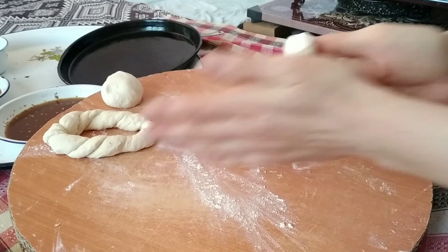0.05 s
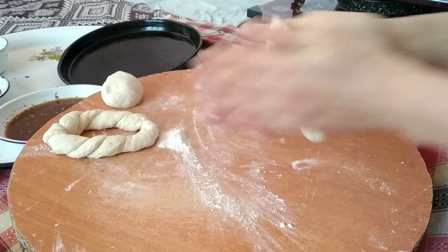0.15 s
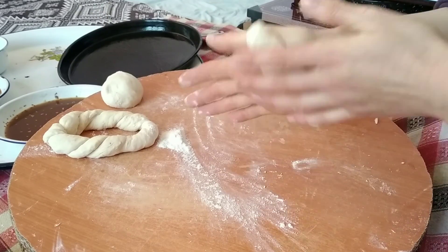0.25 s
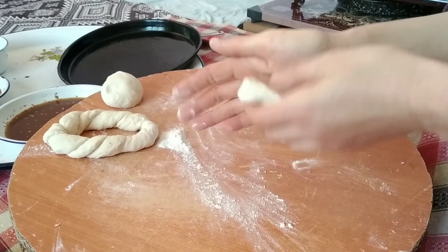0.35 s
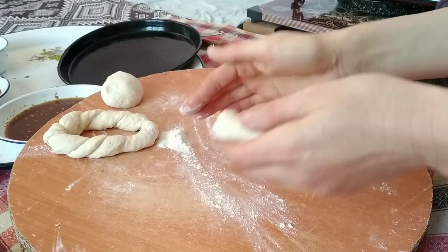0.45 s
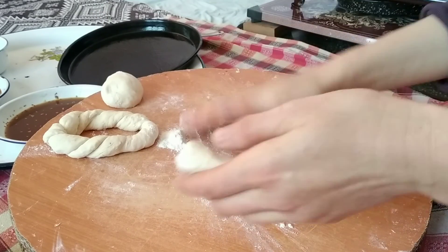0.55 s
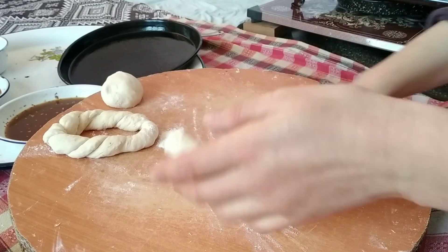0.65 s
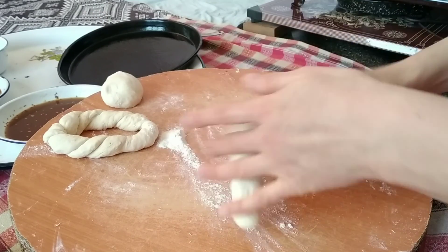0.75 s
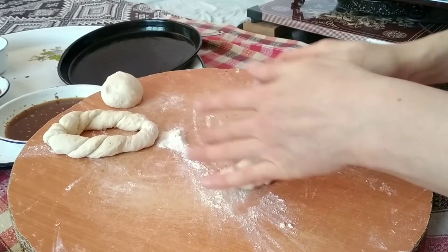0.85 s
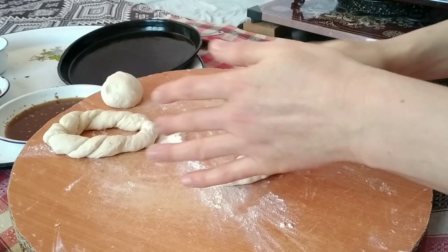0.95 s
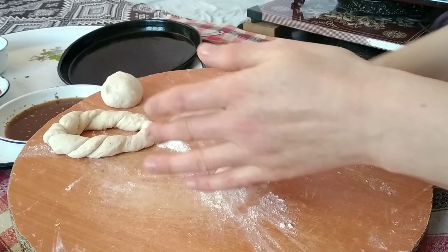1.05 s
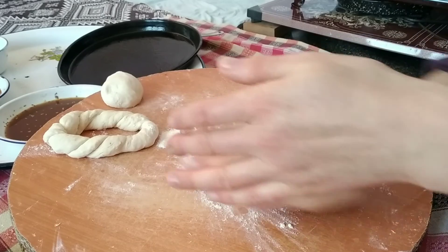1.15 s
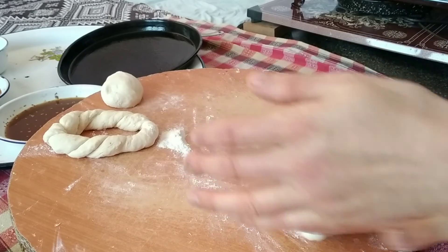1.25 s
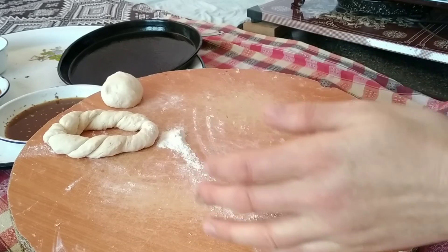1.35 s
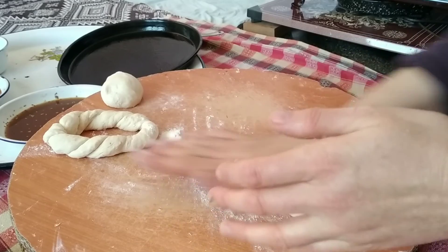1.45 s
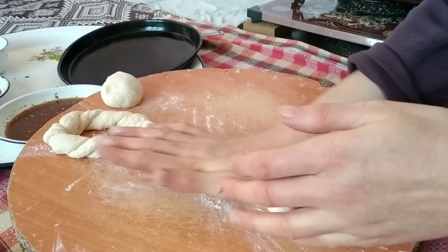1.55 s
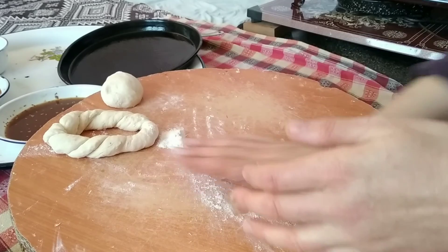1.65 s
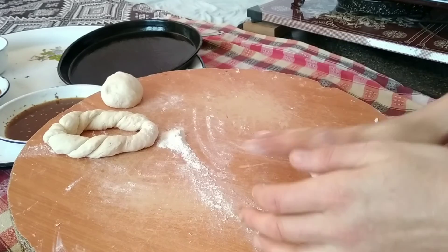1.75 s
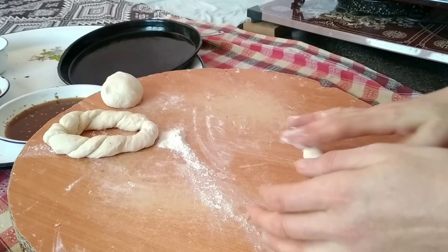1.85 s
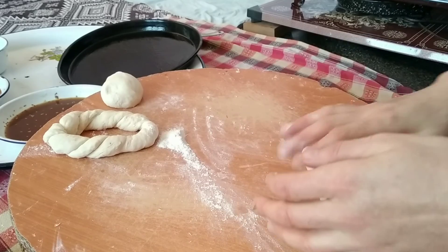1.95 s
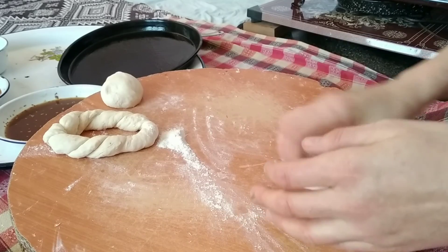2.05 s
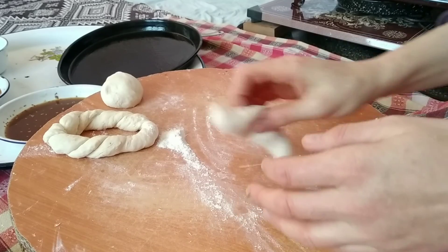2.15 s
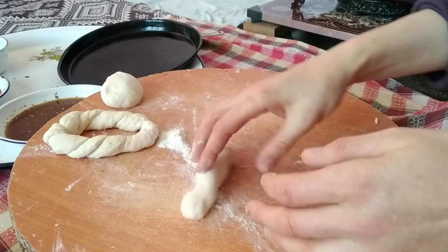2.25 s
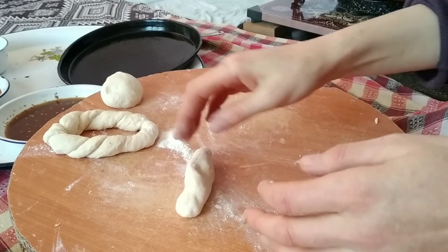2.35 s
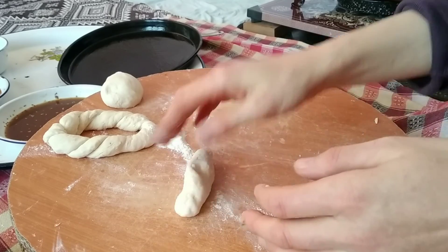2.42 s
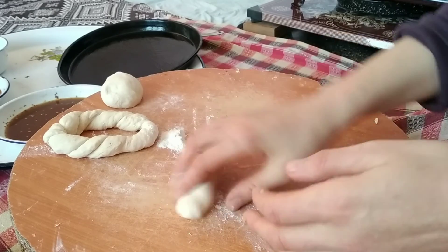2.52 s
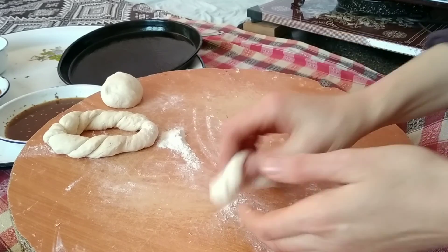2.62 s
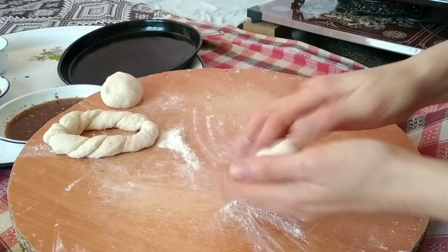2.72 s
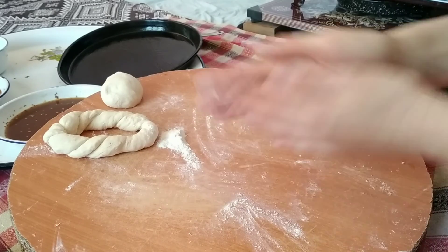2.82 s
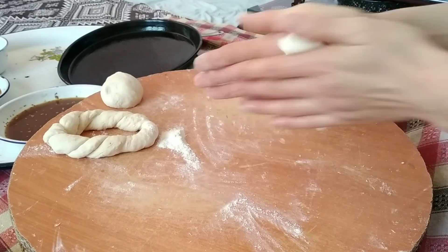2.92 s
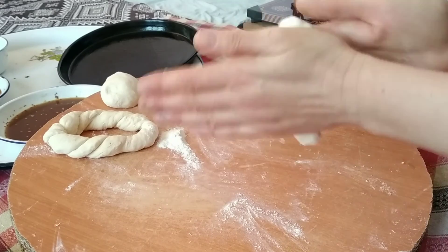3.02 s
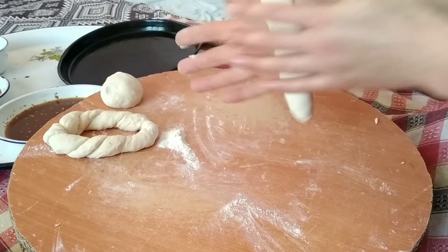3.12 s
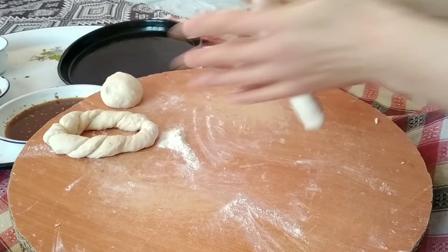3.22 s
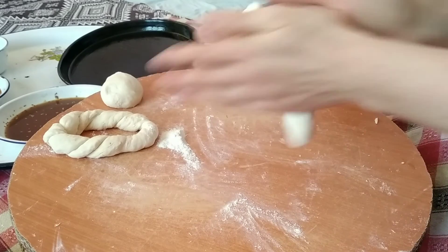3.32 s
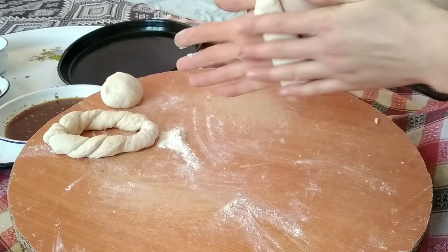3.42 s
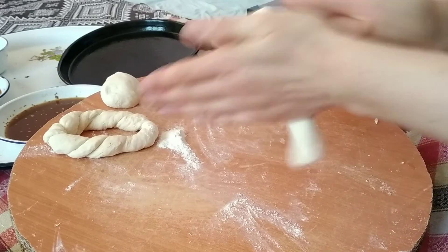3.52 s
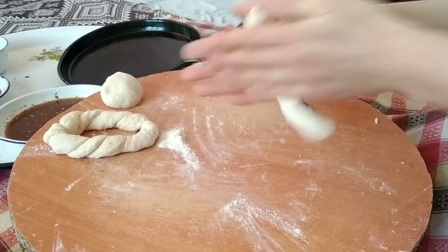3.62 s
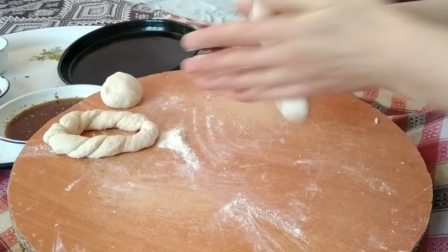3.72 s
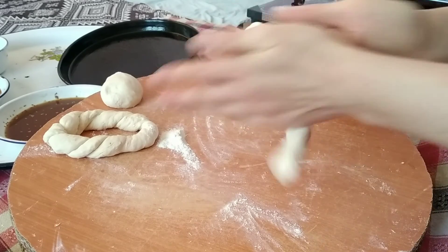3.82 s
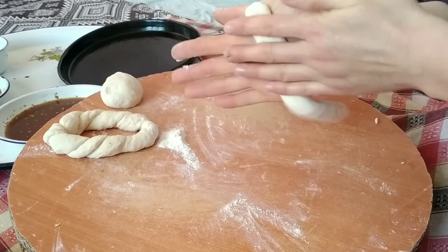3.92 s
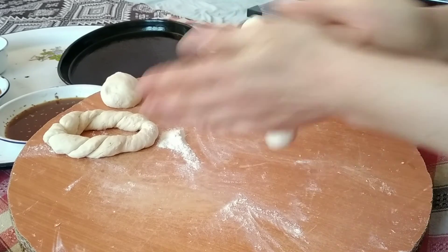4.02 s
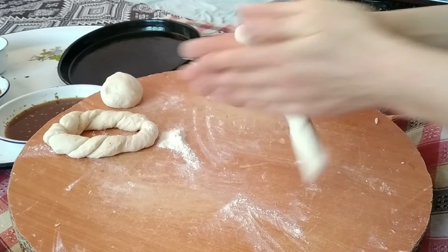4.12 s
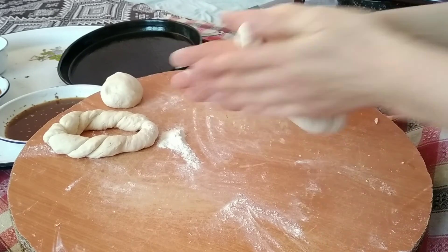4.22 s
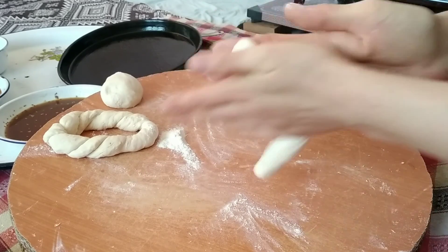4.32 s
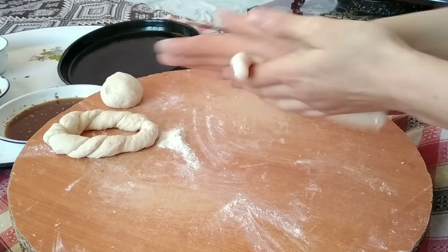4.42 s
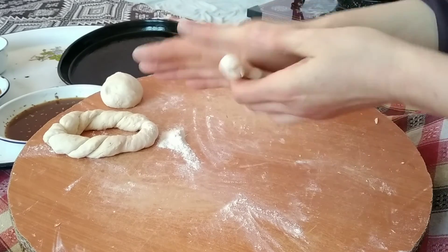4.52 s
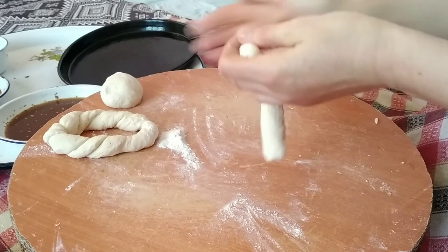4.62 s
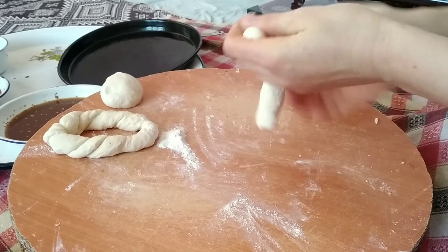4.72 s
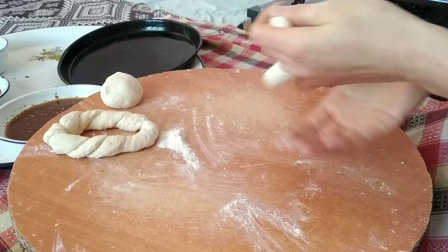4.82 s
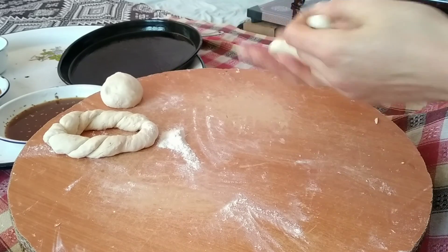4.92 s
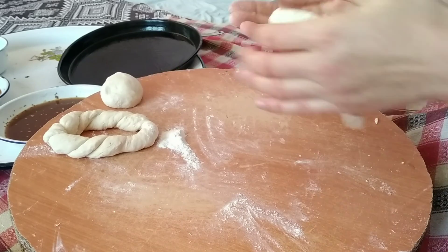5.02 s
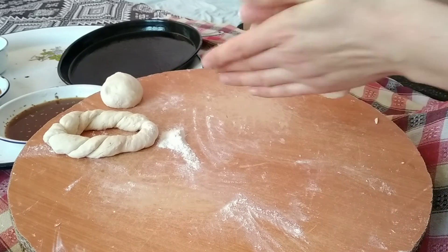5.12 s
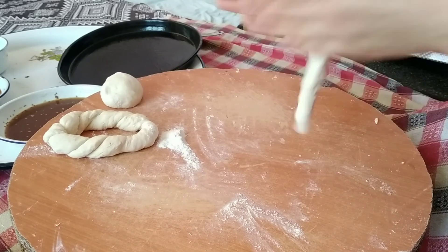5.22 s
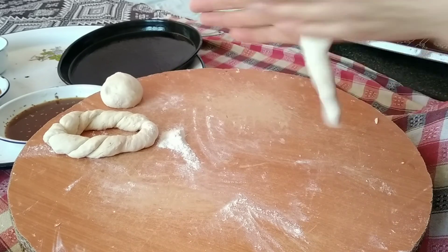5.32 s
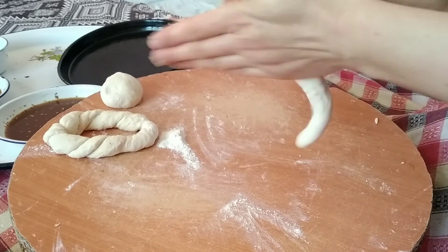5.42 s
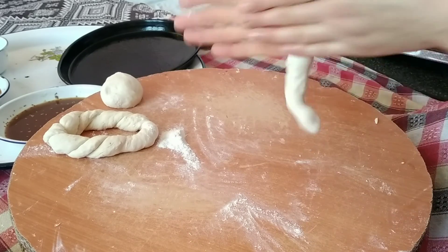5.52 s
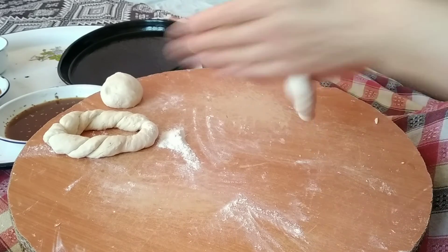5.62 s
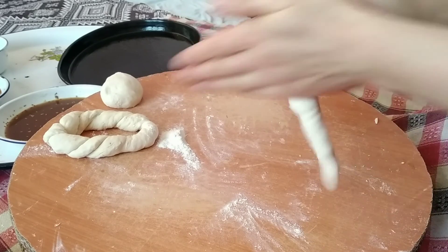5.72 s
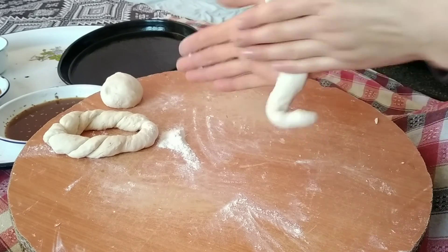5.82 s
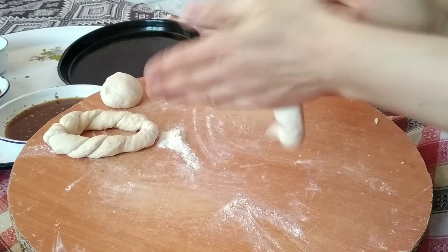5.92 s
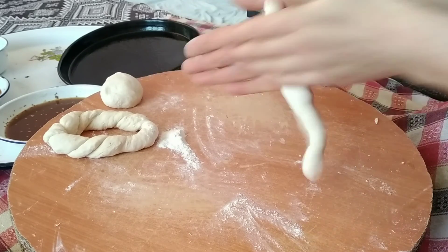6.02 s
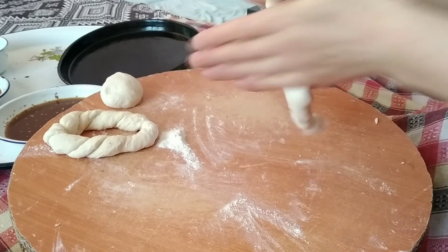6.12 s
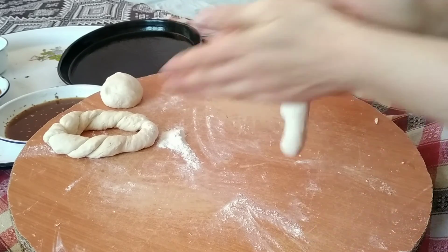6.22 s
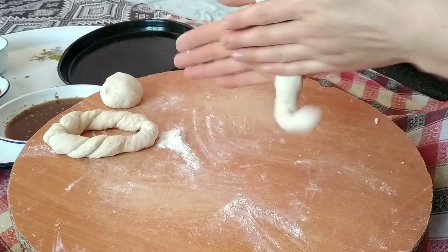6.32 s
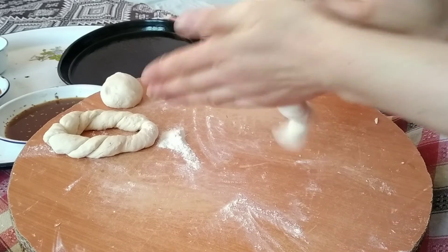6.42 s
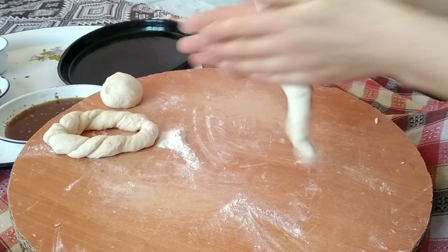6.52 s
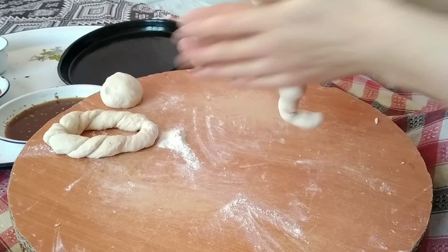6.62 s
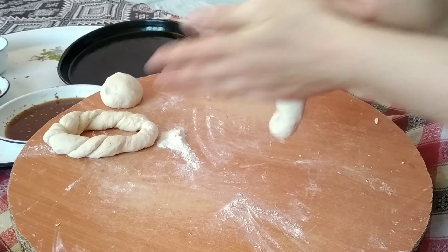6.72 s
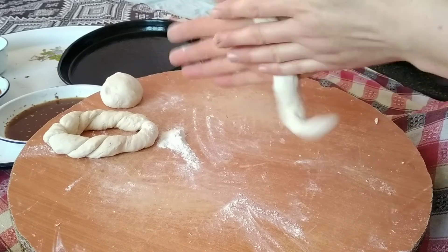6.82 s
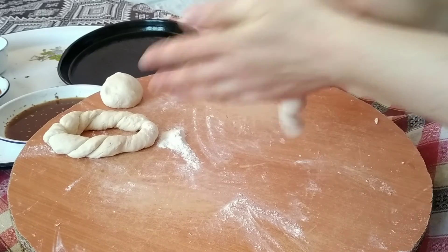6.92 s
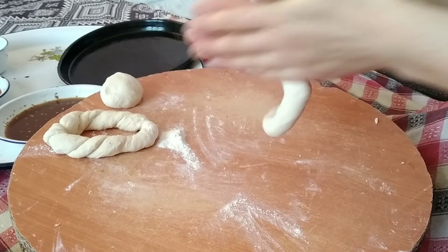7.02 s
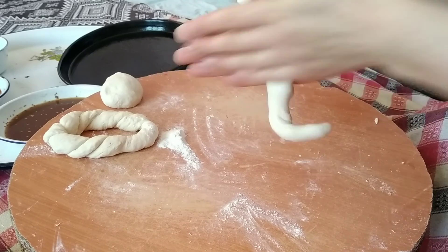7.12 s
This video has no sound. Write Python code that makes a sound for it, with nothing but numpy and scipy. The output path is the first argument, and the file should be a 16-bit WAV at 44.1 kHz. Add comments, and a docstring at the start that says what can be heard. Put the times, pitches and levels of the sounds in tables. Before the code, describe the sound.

A quiet kitchen heard close up, with steady faint airy hiss and low rumble throughout. From 0 to 0.7 s floury hands make brief soft scuffs. A hollow low knock on the wooden board with a woody click lands at 0.8 s, followed by small dull pats around 1.1-1.3 s and longer dry rubs at 1.4 and 1.6 s. A deep soft thump comes at 2.0 s, a lighter one at 2.25 s and another firm one at 2.5 s, among short slides. From 2.8 to 4.4 s palms rub quickly to and fro, about eight dry swishes a second, each with a hollow airy pitch that dips and rises; a faint low bump sits near 4.0 s. Between 4.5 and 5.1 s there are only sparse scuffs and tiny pats. From 5.15 s the rapid, gritty rubbing resumes, slightly thinner and uneven in strength, continuing to the end just after 7 s.

```python
"""Two floury palms roll a piece of dough to and fro above a round wooden board in a quiet kitchen.
Each stroke is a short dry hiss of shaped noise, with a hollow pocket tone whose pitch dips and rises again.
Dough and knuckles knock on the board: ringing modes give a low boom and woody clicks, noise gives the slap.
A short noise reverb is the room; steady airy hiss, faint low rumble and one soft bump are the house."""
import sys
import numpy as np
from scipy import signal
from scipy.fft import rfft, irfft, next_fast_len
from scipy.io import wavfile

SR = 44100
rng = np.random.default_rng(int(sys.argv[2]) if len(sys.argv) > 2 else 0)


def wrap_up_sound(samples):
    """Save the sound to the file named by the first command line argument, as 16-bit audio."""
    columns = np.atleast_2d(samples).T
    # keep every value between -1 and 1, then stretch to whole-number steps
    tamed = np.clip(columns, -1, 1)
    steps = np.round(tamed * 32767).astype(np.int16)
    wavfile.write(sys.argv[1], SR, steps)


N = 315756   # length in samples
STEP = 64   # samples between control points
RUN_IN = 2000   # control points dropped while a slow filter settles

# Palm strokes, to and fro:
# (start [s], hold [s], flour hiss before colouring [dB], lowest pitch of the air pocket [Hz])
PALM_STROKES = [(0.121, .073, -48.4, 1700), (1.378, .109, -49.9, 1150), (1.588, .085, -50.6, 1600),
                (2.79, .055, -43.8, 750), (2.918, .06, -49.8, 2000), (3.043, .048, -44.4, 1650),
                (3.175, .057, -46.4, 1900), (3.298, .057, -43, 1900), (3.433, .06, -46.5, 2100),
                (3.553, .048, -41.0, 1650), (3.694, .046, -44.1, 1900), (3.806, .054, -41.8, 1650),
                (3.941, .064, -45.6, 1600), (4.061, .047, -42.6, 2200), (4.199, .064, -47.8, 2000),
                (4.321, .12, -43.5, 2600), (5.154, .06, -45.8, 2100), (5.285, .085, -47, 2300),
                (5.413, .065, -43, 1900), (5.568, .06, -45.6, 2300), (5.681, .072, -45.4, 2300),
                (5.821, .08, -46.4, 2100), (5.93, .073, -45.5, 2300), (6.075, .056, -44.8, 2100),
                (6.2, .05, -44.3, 1800), (6.316, .075, -47.2, 1800), (6.45, .047, -41.3, 1600),
                (6.566, .085, -50.8, 1550), (6.704, .048, -44.6, 1700), (6.84, .045, -48.5, 1750),
                (6.959, .05, -46.6, 1750), (7.089, .058, -51.3, 1900)]
ROLL_RISE_S, ROLL_FALL_S = .016, .025   # the hiss edges gain or lose 8 dB in this time
USUAL_HISS_DB, DRAG_DB = -45, -57   # reference stroke hiss, and the skin drag that goes with it
# Share of a stroke's extra hiss that each layer takes on: (dough [dB/dB], hollow [dB/dB], drag [dB/dB])
FOLLOW_SHARES = (.2, .4, .45)
# The lump thins to a rope and the palms cup closer; levels at the usual hiss:
# (time [s], dough [dB], palm hollow [dB])
GRIP = [(0, -64, -64), (2.8, -65, -66), (3.3, -68, -63), (4.3, -70, -66), (5.4, -73, -67), (6.1, -71, -64),
        (7.1, -73, -63)]
# Other short slides, scuffs and pats of hands and dough, some leading into or between palm strokes:
# (start [s], hold [s], rise [s per 8 dB], fall [s per 8 dB], flour hiss before colouring [dB],
#  skin drag re hiss [dB], dough re hiss [dB]); the rise and fall are those of the hiss
SHORT_SLIDES = [(0.0, .031, .012, .03, -49.2, -10.6, -17.5), (0.298, .025, .017, .017, -49, -16, -23.3),
                (0.415, .02, .02, .06, -64.5, -6, -13.5), (0.574, .089, .005, .032, -48.4, -11.3, -30),
                (0.792, .018, .002, .045, -49.5, -9, -20), (1.096, .012, .005, .017, -60.8, -5.3, -17.1),
                (1.153, .061, .03, .045, -51.5, -7, -12), (1.338, .026, .012, .03, -49.5, -2.5, -17.5),
                (1.981, .03, .007, .05, -54.5, -13.2, -17.9), (2.045, .025, .015, .04, -60, -6, -12),
                (2.157, .034, .021, .035, -64.5, -11.7, -14.8), (2.23, .024, .012, .032, -57.4, -3, -11),
                (2.516, .062, .011, .046, -51.3, -7.5, -18.5), (2.651, .016, .006, .024, -47.4, -13.2, -15),
                (2.755, .03, .02, .02, -56, -16, -20), (4.472, .041, .027, .011, -48.9, -17.6, -24.1),
                (4.895, .03, .004, .022, -52.9, -12.2, -21.9), (5.07, .022, .018, .04, -52.7, -8.5, -17),
                (5.779, .008, .004, .012, -48, -16, -30)]
SLIDE_HOLLOW_DB = -7.5   # palm hollow re skin drag in the short slides
# How steeply each layer fades: (dough [ratio], hollow [ratio], drag [ratio], hiss [ratio])
EDGE_STEEPNESS = (.9, .8, .85, 1)
# How much each layer swells towards mid-stroke: (dough [ratio], hollow [ratio], drag [ratio], hiss [ratio])
ARCH_AMOUNT = (.5, .5, .5, 1)
# Friction colour, before the layer levels: (frequency [Hz], relative level [dB])
FRICTION_COLOUR = [(450, -8), (750, 0), (1100, -3), (1400, -4), (1800, -1), (2400, -1.5), (3000, -1),
                   (4000, 1), (6000, 2), (6500, -10), (7500, -4), (8900, 1), (11500, -4), (15500, -6)]
# Crossovers between the layers: (dough to hollow [Hz], hollow to drag [Hz], drag to hiss [Hz])
LAYER_SPLITS = (1300, 2500, 6300)
LOWEST_RUB_HZ = 400
CUP_CLOSED_AT, CUP_DB = .62, 2.1   # share of the hold where the pocket is lowest; level re palm hollow
CUP_WIDTH_HZ, CUP_OCTAVE_S = 130, .09   # resonance width; time to rise an octave
CUP_LIFE_S = .045   # this far from its lowest pitch the pocket tone is 6 dB down

# Knocks and pats, each layer with its own make-up gain in board():
# (time [s], boom [relative dB], low wood [relative dB], high wood [relative dB], slap [relative dB])
KNOCKS = [(0.789, -23, -49, -36, -42), (1.1, -44, -71, -55, -59), (1.13, -41, -53, -63, -63),
          (1.161, -38, -48, -57, -55), (1.297, -49, -56, -63, -66), (1.675, -45, -54, -62, -61),
          (1.988, -19, -46, -47, -67), (2.239, -36, -57, -51, -56), (2.5, -21, -46, -55, -56),
          (2.656, -45, -61, -58, -58), (2.702, -51, -66, -61, -65), (2.81, -52, -70, -55, -58),
          (4.495, -49, -75, -63, -63), (4.898, -53, -72, -65, -62), (5.074, -51, -69, -57, -55.5)]
# Low modes of the board on its cloth: (frequency [Hz], relative level [dB], t60 [s])
BOOM_MODES = [(142, -17, .5), (155.5, 0, .25), (187, -12, .17), (207, -5, .07), (260, -15, .2)]
# Which way each boom mode starts, in order: (polarity [+1 or -1] per mode)
BOOM_POLARITY = (1, 1, 1, -1, 1)
# Higher wood modes of the board: (frequency [Hz], relative level [dB], t60 [s])
WOOD_MODES = [(330, -4, .09), (372, 0, .1), (430, -5, .08), (490, -2, .1), (545, -3, .09), (600, -4, .09),
              (655, -3, .09), (700, -3, .08), (740, -2, .09), (815, -3, .08), (870, -1, .1), (930, -4, .07),
              (1030, -6, .05), (1150, -7, .05), (1280, -7, .05), (1450, -9, .04)]

KITCHEN_T60_S, WALL_CUT_HZ, WET_DB = .65, 13000, -16
# A soft bump in the house: (time [s], frequency [Hz], level before its swell [dB], t60 [s])
HOUSE_BUMP = (3.975, 74, -32, .3)
# Broad bass resonances of the room: (frequency [Hz], width [Hz], level per Hz at the peak [dB])
ROOM_RUMBLE = [(26, 7, -77), (62, 15, -65), (52, 4, -68), (84, 18, -66), (115, 14, -65), (140, 18, -74),
               (170, 22, -80), (220, 60, -80.5)]
# Steady background noise: (frequency [Hz], level per Hz [dB])
AIR_NOISE = [(20, -94), (42, -112), (200, -95), (300, -95.5), (450, -103), (1000, -109), (1600, -109),
             (2500, -113), (5700, -113.5), (8800, -107), (12000, -113), (15500, -108)]
# Stereo image, 1 is mono: (frequency [Hz], left-right likeness [0 to 1])
STEREO_LIKENESS = [(30, .97), (130, .98), (250, .55), (600, .55), (1400, .4), (3100, .35), (6100, .15),
                   (7000, .95), (10000, .96), (15000, .7)]
BASS_LEAN_DB = -1.0   # left minus right, for board, house and bump
CUTOFF_HZ = 16100


def palms(grit_db, patchy_db):
    """Flour under sliding skin: fine noise that catches and slips many times a second."""
    grit = .55 * drift(45) + .8 * drift(200)
    levels_db = stroke_levels() + grit_db * grit
    per_hz_db = (-27.5, -30, -35.5, -37.5)   # spreads each layer's level over its width
    shared, apart = np.zeros((2, N))
    for hz, mid, side in bands(LOWEST_RUB_HZ):
        layer = np.searchsorted(LAYER_SPLITS, hz)
        colour_db = at_hz(FRICTION_COLOUR, hz) + per_hz_db[layer]
        gain = every_sample(from_db(colour_db + levels_db[layer] + patchy_db * drift(14)))
        shared += gain * mid
        apart += gain * side
    return cupped_air(levels_db[1]) + np.array([shared + apart, shared - apart])


def stroke_levels():
    """Level in dB of dough, hollow, drag and hiss: the powers of palm strokes and short slides add up."""
    power = 1e-14   # floor that keeps the logarithm finite
    grip_s, dough_db, hollow_db = np.transpose(GRIP)
    for start, hold, hiss_db, _ in PALM_STROKES:
        usual = np.array([np.interp(start, grip_s, dough_db), np.interp(start, grip_s, hollow_db), DRAG_DB])
        body_db = usual + np.array(FOLLOW_SHARES) * (hiss_db - USUAL_HISS_DB)
        power = power + swell(start, hold, ROLL_RISE_S, ROLL_FALL_S, [*body_db, hiss_db])
    for start, hold, rise, fall, hiss_db, drag, dough in SHORT_SLIDES:
        layers_db = hiss_db + np.array([dough, drag + SLIDE_HOLLOW_DB, drag, 0])
        power = power + swell(start, hold, rise, fall, layers_db)
    return 10 * np.log10(power)


def swell(start, hold, rise, fall, layers_db):
    """Power of dough, hollow, drag and hiss for one movement: it swells, holds and fades."""
    s = control_time() - start
    arch = 1.5 - 5.5 * np.clip(2 * s / hold - 1, -1, 1) ** 2   # speed peaks mid-stroke
    edge = -8 * np.maximum(-s, 0) / rise - 8 * np.maximum(s - hold, 0) / fall
    shape_db = np.outer(ARCH_AMOUNT, arch) + np.outer(EDGE_STEEPNESS, edge)
    return from_db(2 * (shape_db + np.array(layers_db)[:, None]))


def cupped_air(hollow_db):
    """Friction noise rings in the pocket between closing and opening palms: pitch dips each stroke."""
    start, hold, _, lowest_hz = np.transpose(PALM_STROKES)
    gap = control_time()[:, None] - (start + CUP_CLOSED_AT * hold)
    nearest = np.argmin(np.abs(gap), axis=1)
    away = gap[np.arange(len(gap)), nearest]
    centre = lowest_hz[nearest] * 2 ** np.minimum(np.abs(away) / CUP_OCTAVE_S, 1)   # at most an octave up
    friction = rng.standard_normal((2, N))
    mid, side = rms_one(gliding_resonance(friction, centre, CUP_WIDTH_HZ))
    gain = every_sample(from_db(hollow_db + CUP_DB - 6 * (away / CUP_LIFE_S) ** 2))
    return gain * (.85 * mid + .45 * side * [[1], [-1]])


def gliding_resonance(x, hz, width_hz):
    """Two-pole resonance whose centre moves block by block."""
    r = np.exp(-np.pi * width_hz / SR)
    state, out = np.zeros((2, 2)), np.zeros_like(x)
    for k in range(0, N // STEP + 1, 2):
        block = slice(k * STEP, (k + 2) * STEP)
        poles = [1, -2 * r * np.cos(2 * np.pi * hz[k] / SR), r * r]
        out[:, block], state = signal.lfilter([1, 0, -1], poles, x[:, block], zi=state)
    return out


def bands(low_hz):
    """Third-octave noise, unit level per Hz: yields centre, shared part and part that differs by ear."""
    edges = low_hz * 2 ** np.arange(0, np.log2(19000 / low_hz), 1 / 3)
    white = rng.standard_normal((2, 2, N)) * np.sqrt(SR) / 2
    for k, (low, high) in enumerate(zip(edges, edges[1:])):
        hz = np.sqrt(low * high)
        alike = np.clip(at_hz(STEREO_LIKENESS, hz), 0, 1)
        sos = signal.butter(2, [low, high], "band", fs=SR, output="sos")
        sos[0, :3] *= np.sqrt(1 + alike)
        mid, side = signal.sosfilt(sos, white[k % 2])   # neighbouring bands use different noise
        yield hz, mid, side * np.sqrt((1 - alike) / (1 + alike))


def board():
    """Knocks ring the board's modes and start with a short slap of dough or skin."""
    boom = soften(np.array(BOOM_POLARITY) @ rings(BOOM_MODES), .0009)
    # a small board radiates no deep bass
    boom = signal.sosfilt(signal.butter(2, 120, "high", fs=SR, output="sos"), boom)
    wood = soften(rings(WOOD_MODES), .0001)
    low = np.array(WOOD_MODES)[:, 0] < 620
    dying = from_db(-60 * np.arange(SR // 2) / SR / .012)   # slap t60 of 12 ms
    slap_colour = signal.butter(2, [600, 13000], "band", fs=SR, output="sos")
    out = np.zeros(N + SR)
    for s, boom_db, dull_db, bright_db, slap_db in KNOCKS:
        # the spot struck differs, so every mode gets its own level and polarity
        mode_db = np.where(low, dull_db, bright_db) - 3.5 + 3.0 * rng.standard_normal(len(low))
        strength = from_db(mode_db) * rng.choice([-1, 1], len(low))
        slap = signal.sosfilt(slap_colour, dying * rng.standard_normal(SR // 2))
        knock = from_db(boom_db + 5.5) * boom - strength @ wood + from_db(slap_db + 11.5) * slap
        first = int(s * SR)
        out[first:first + SR // 2] += knock
    return out[:N]


def rings(modes):
    """Each mode's decaying sine over half a second, one row per mode."""
    hz, db, t60 = np.transpose(modes)[:, :, None]
    t = np.arange(SR // 2) / SR
    return from_db(db - 60 * t / t60) * np.sin(2 * np.pi * hz * t)


def soften(x, contact_s):
    """A soft contact spreads a click over a short time."""
    r = np.exp(-1 / (contact_s * SR))
    return signal.lfilter([(1 - r) ** 2], [1, -2 * r, r * r], x + 1e-18)


def kitchen(x):
    """Dense reflections: a dying noise for each ear, dulled by the walls and thin in the bass."""
    t = np.arange(SR // 2) / SR
    echo = rng.standard_normal((2, len(t))) * from_db(-60 * t / KITCHEN_T60_S) * (t > .006)
    echo = signal.sosfilt(signal.butter(1, [400, WALL_CUT_HZ], "band", fs=SR, output="sos"), echo)
    echo = echo / np.sqrt(np.sum(echo ** 2, axis=1, keepdims=True))
    return signal.oaconvolve(x[None], echo, axes=1)[:, :N]


def thud():
    """A low soft bump: one decaying sine that swells in over a few cycles."""
    s, hz, db, t60 = HOUSE_BUMP
    t = np.maximum(np.arange(N) / SR - s, 0)
    return from_db(db - 60 * t / t60) * (1 - np.exp(-t / .012)) * np.sin(2 * np.pi * hz * t)


def house():
    """Steady airy hiss, with low noise gathered in the room's broad bass resonances."""
    size = next_fast_len(N)
    hz = np.maximum(np.arange(size // 2 + 1) * SR / size, 1)
    power = from_db(2 * at_hz(AIR_NOISE, hz))
    for centre_hz, width_hz, db in ROOM_RUMBLE:
        power = power + from_db(2 * db) / (1 + (2 * (hz - centre_hz) / width_hz) ** 4)
    alike = np.clip(at_hz(STEREO_LIKENESS, hz), 0, 1)
    shaping = np.sqrt(power * SR / 2 * (1 + alike * [[1], [-1]]))
    mid, side = rfft(rng.standard_normal((2, size))) * shaping
    return irfft(np.array([mid + side, mid - side]), size)[:, :N] / np.sqrt(2)


def from_db(db):
    """Decibels to gain."""
    return 10 ** (np.asarray(db) / 20)


def rms_one(x):
    """Scale to rms 1."""
    return x / np.sqrt(np.mean(x ** 2) + 1e-20)


def at_hz(points, hz):
    """Read a spectrum on a log frequency axis."""
    point_hz, value = np.array(points).T
    return np.interp(np.log(hz), np.log(point_hz), value)


def control_time():
    """Seconds of the control points."""
    return np.arange(N // STEP + 2) * STEP / SR


def every_sample(control):
    """Join control points by straight lines."""
    return np.interp(np.arange(N) / SR, control_time(), control)


def drift(rate):
    """Random wander at the control points: noise through a double one-pole at rate [Hz]; spread 1."""
    r = np.exp(-2 * np.pi * STEP * rate / SR)
    noise = rng.standard_normal(len(control_time()) + RUN_IN)
    return rms_one(signal.lfilter([1], [1, -2 * r, r * r], noise)[RUN_IN:])


def scene():
    """Hands and board up close, with room and background."""
    lean = from_db([[BASS_LEAN_DB / 2], [-BASS_LEAN_DB / 2]])
    near = palms(grit_db=1.6, patchy_db=2.6) + board() * lean
    room = from_db(WET_DB) * kitchen(near.mean(axis=0))
    return near + room + (house() + thud()) * lean


def record(dry):
    """A steep low-pass cuts the top."""
    return signal.sosfilt(signal.cheby2(16, 75, CUTOFF_HZ, fs=SR, output="sos"), dry)


dry = scene()
out = record(dry)
wrap_up_sound(out)
```